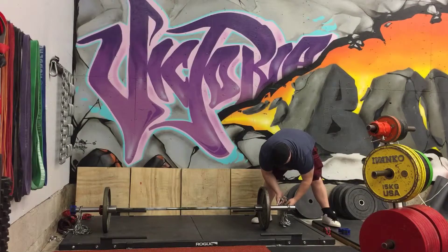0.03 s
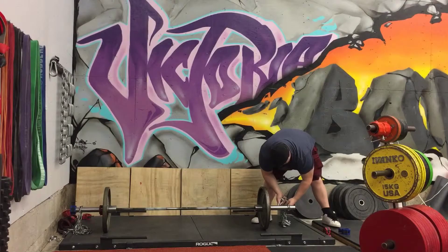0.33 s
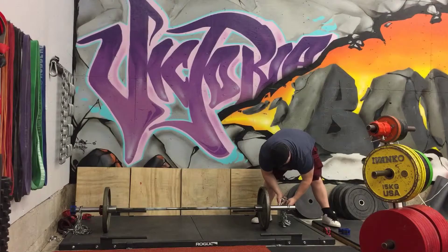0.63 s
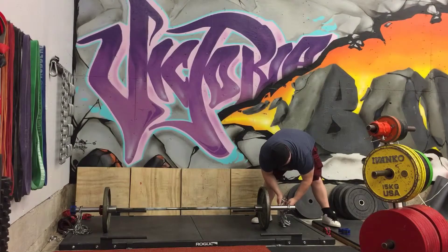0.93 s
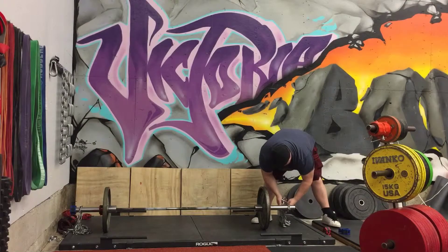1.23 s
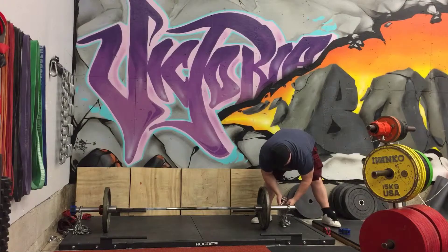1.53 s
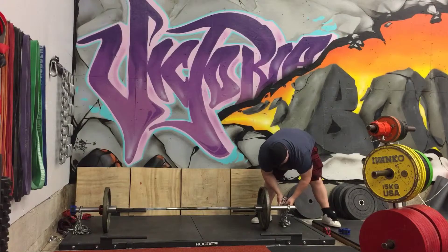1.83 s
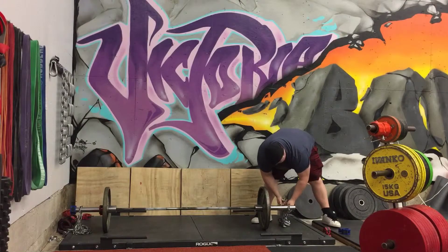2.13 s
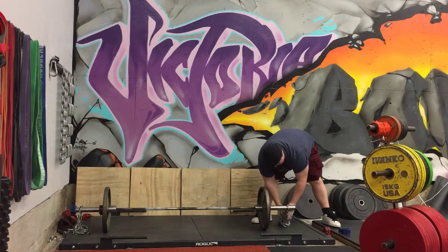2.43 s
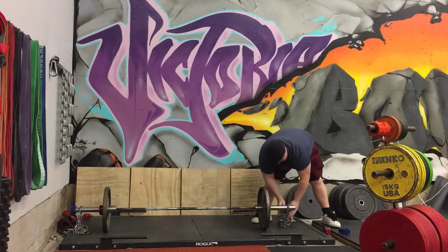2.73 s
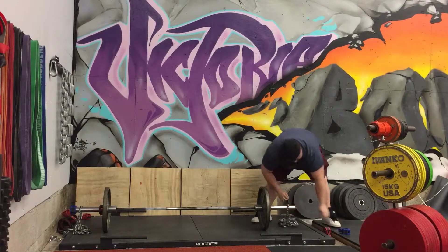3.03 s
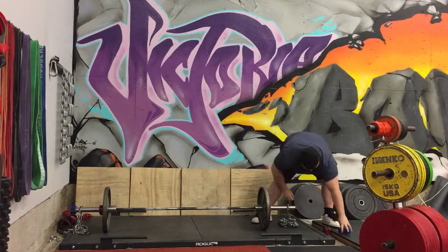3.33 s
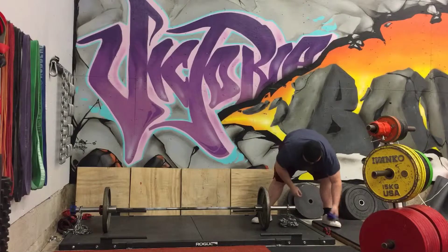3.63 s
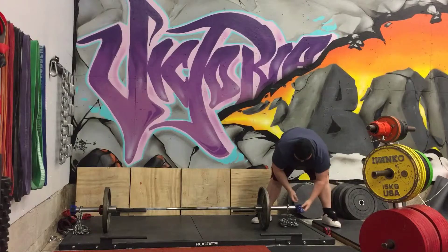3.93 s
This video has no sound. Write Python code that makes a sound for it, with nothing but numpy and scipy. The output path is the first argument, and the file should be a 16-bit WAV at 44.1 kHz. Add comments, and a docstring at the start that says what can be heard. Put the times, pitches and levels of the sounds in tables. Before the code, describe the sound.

Bright, scattered clinks of a metal chain turn into knocks on a barbell that rattle its plates. The chain spills onto rubber flooring twice, and a light iron knock follows. Ventilation hums quietly in the reverberant gym.

```python
"""Ventilation hums in a hard, reverberant gym. For two seconds a steel chain is handled at the end of
a loaded barbell: each contact is a short clack plus the very high ring of the links, in two pitch groups.
From 1.2 s it knocks and slides on the bar, which rings faintly; the knocks rattle the loose plates.
It is let down in two pours, near 2.3 s and 3.0 s, and the heap thuds on the rubber floor.
A light knock of iron ends it at 3.4 s."""
import sys
import numpy as np
from scipy import signal
from scipy.fft import rfft, irfft
from scipy.io import wavfile

SR = 44100
rng = np.random.default_rng(int(sys.argv[2]) if len(sys.argv) > 2 else 0)


def log_audio(samples):
    """Write samples as a 16-bit WAV file to the path given in sys.argv[1]."""
    # one column per channel
    frames = np.atleast_2d(samples).T
    # limit to full scale, then quantise
    limited = np.clip(frames, -1, 1)
    pcm = np.round(limited * 32767).astype(np.int16)
    wavfile.write(sys.argv[1], SR, pcm)


N = 176400

RING_RISE_S, CLACK_RISE_S = 0.0025, 0.00065
# Chain knocks on the bar. Each row: time in seconds, relative level in dB.
BAR_HITS = [(1.203, -60), (1.216, -58), (1.283, -69), (1.536, -64), (2.4524, -48), (2.572, -54.5),
            (3.072, -66)]


def from_db(db):
    """Decibels to gain."""
    return 10 ** (np.asarray(db) / 20)


def at_hz(points, hz, column=1):
    """Table column interpolated over log frequency."""
    points = np.array(points)
    return np.interp(np.log(np.maximum(hz, 1)), np.log(points[:, 0]), points[:, column])


def noise(spectrum):
    """Coloured noise, rms 1."""
    gains = from_db(at_hz(spectrum, np.fft.rfftfreq(N, 1 / SR)))
    x = irfft(rfft(rng.standard_normal(N)) * gains, N)
    return x / x.std()


def bell(hz, octaves):
    """Spectrum of a broad resonance, 3 dB down at `octaves` from its centre."""
    return [(hz * 2 ** (k * octaves), -10 * np.log10(2) * k * k) for k in range(-6, 7)]


def decay(t60_s, rise_s=1e-6):
    """Quick rise, exponential fall to -60 dB."""
    t = np.arange(int(t60_s * SR)) / SR
    return np.exp(-np.log(1000) * t / t60_s) * (1 - np.exp(-t / rise_s))


def add(out, start_s, sound):
    """Mix a sound in at start_s."""
    i = int(np.clip(start_s * SR, 0, N - 1))
    out[i:i + len(sound)] += sound[:N - i]


def sines(hz, phase_cycles, length):
    """One unit sine per row."""
    t = np.arange(length) / SR
    return np.sin(2 * np.pi * (np.outer(hz, t) + phase_cycles[:, None]))


def bursts(times_s, levels_db, spectrum, t60_s, rise_s=CLACK_RISE_S):
    """Damped impacts: fast-decaying coloured noise."""
    envelope = np.zeros(N)
    for start_s, db in zip(times_s, levels_db):
        add(envelope, start_s, from_db(db) * decay(t60_s, rise_s))
    return envelope * noise(spectrum)


def ventilation(air_db=-69, waver_depth=0.17):
    """Soft rumble and hiss with a slightly wavering hum."""
    # Air noise. Each row: frequency in Hz, relative density in dB.
    air = [(25, -28.5), (40, -2.5), (58, 5.5), (85, -1.5), (115, -5.5), (160, -12), (240, -10.5),
           (430, -24), (900, -27), (3500, -33), (5200, -39.5), (9500, -41), (15000, -50.5)]
    # Hum tones. Each row: frequency in Hz, rms level in dB.
    hum = [(120, -67.5), (240, -78), (360, -88.5), (565, -91)]
    out, t = from_db(air_db) * noise(air), np.arange(N) / SR
    for hz, db in hum:
        waver = np.interp(t, np.linspace(0, t[-1], 32), rng.standard_normal(32))
        tone = np.sin(2 * np.pi * (hz * t + rng.random()))
        out += np.sqrt(2) * from_db(db) * (1 + waver_depth * waver) * tone
    return out


def gym_reverb(direct, delay_s=0.0054):
    """Diffuse tail that dies band by band, treble first."""
    # Reverberation. Each row: frequency in Hz, level in dB re direct sound, T60 in seconds.
    room = [(100, 7, 1.6), (280, 5.5, 1.5), (520, -0.5, 1.26), (1550, -0.5, 1.46), (3390, -2.5, 1.25),
            (6560, -5, 0.83), (10930, -4.5, 0.44), (12100, -5.5, 0.31), (15500, -19, 0.17)]
    edges_hz = np.r_[np.geomspace(60, 6000, 13), np.linspace(7500, 16500, 7)]
    tail, white = np.zeros(N), rng.standard_normal((2, N))
    for k, (low_hz, high_hz) in enumerate(zip(edges_hz, edges_hz[1:])):
        hz = np.sqrt(low_hz * high_hz)
        fade = decay(at_hz(room, hz, column=2))
        bandpass = signal.butter(2, [low_hz, high_hz], "band", fs=SR, output="sos")
        band = signal.sosfilt(bandpass, white[k % 2, :len(fade)])
        add(tail, delay_s, from_db(at_hz(room, hz)) * band * fade / np.linalg.norm(fade))
    return signal.fftconvolve(direct, tail)[:N]


def struck_iron(hits, modes, spread=0.039, count=8):
    """Loose plates spread each mode into a cluster of close partials, new at each blow."""
    out = np.zeros(N)
    for hz, mode_db, t60_s in modes:
        fade = decay(t60_s, CLACK_RISE_S)
        for (start_s, db), (detune, phase) in zip(hits, rng.random((24, 2, count))):
            cluster = sines(hz * (1 + spread * (2 * detune - 1)), phase, len(fade)).sum(axis=0)
            add(out, start_s, from_db(db + mode_db) * fade * cluster / np.sqrt(count))
    return out


def bar_ring(gain_db=-7, slip_count=7):
    """The bar rings as the chain knocks on it and slides along it in uneven slips."""
    # Bar modes. Each row: frequency in Hz, relative level in dB, T60 in seconds.
    modes = [(536, -18, .4), (1734, -22, .47), (2560, -7.5, .45), (2750, -11.5, 0.32), (4400, -7.5, .36)]
    # The slide: start in seconds, end in seconds, relative level in dB.
    slide = (1.2, 1.9, -65.5)
    start_s, end_s, db = slide
    step_s = (end_s - start_s) / slip_count
    slips = [(start_s + (k + late) * step_s, db) for k, late in enumerate(rng.random(slip_count))]
    return from_db(gain_db) * struck_iron(BAR_HITS + slips, modes)


def last_knock(time_s=3.399):
    """One light, quickly damped blow on iron."""
    # Iron modes. Each row: frequency in Hz, level in dB, T60 in seconds.
    modes = [(936, -68, 0.051), (1555, -55.5, 0.037), (2120, -62.5, 0.028), (4500, -65, 0.091)]
    return struck_iron([(time_s, 0)], modes)


def plate_clatter(gain_db=2.5):
    """Loose plates rattle on the bar after each knock of the chain."""
    # Clatter spectrum. Each row: frequency in Hz, relative density in dB.
    spectrum = [(400, -26.5), (1700, -17), (2050, 0), (2650, 2), (3500, -16.5), (4350, 8), (5000, -8),
                (6000, 5), (7800, -10), (9200, 12), (9800, -16.5), (15000, -18)]
    times_s, levels_db = np.transpose(BAR_HITS)
    return bursts(times_s, levels_db + gain_db, spectrum, t60_s=0.15)


def rubber_floor(rise_s=0.005):
    """Each landing is a short slap over a deeper, longer thud, so its pitch sinks."""
    # Chain landings. Each row: time in seconds, thud level in dB, slap level in dB.
    landings = [(1.211, -71.5, -84), (1.29, -76.5, -75), (2.344, -63.5, -58.5), (2.454, -56, -58),
                (2.522, -61.5, -59), (2.576, -63, -64.5), (3.014, -60, -67.5), (3.07, -64, -57.5),
                (3.122, -63.5, -74), (3.299, -67.5, -88)]
    # Thud spectrum. Each row: frequency in Hz, relative density in dB.
    thud = [(60, 7.5), (160, 8.5), (290, 19), (410, 9), (800, -47.5)]
    times_s, thud_db, slap_db = np.transpose(landings)
    slaps = bursts(times_s, slap_db, bell(hz=544, octaves=0.2), t60_s=0.13, rise_s=rise_s)
    return slaps + bursts(times_s, thud_db, thud, t60_s=0.26, rise_s=rise_s)


def contacts(tumbles_per_s=160, scatter_db=10):
    """Distinct clinks, plus small random ones as links tumble over each other."""
    # Each row: time in seconds, then relative levels in dB of clack, high ring, low ring.
    clinks = [(0.002, -72, -51, -75), (0.02, -64.5, -65, -69), (0.202, -64.5, -67.5, -69),
              (0.272, -72, -62, -77), (0.456, -68.5, -62, -83), (0.478, -60, -80, -81),
              (0.52, -70, -46.5, -62), (0.536, -63, -45.5, -64), (0.727, -64.5, -48.5, -74),
              (0.767, -69.5, -58, -82), (0.787, -87, -47.5, -79), (0.822, -83, -48.5, -60),
              (0.861, -63, -43, -52), (0.992, -75, -56.5, -75), (1.197, -62, -55, -85),
              (1.216, -48, -46, -63), (1.236, -63, -50, -60), (1.284, -56, -52, -75), (1.32, -75, -53, -78),
              (1.445, -62, -53, -87), (1.464, -62, -54, -86), (1.536, -50.5, -53.5, -63.5),
              (1.61, -72.5, -53.5, -79), (1.752, -71, -50.5, -67), (1.801, -76.5, -58, -74.5),
              (1.918, -59, -70, -54.5), (1.94, -59, -48.5, -67), (1.966, -62, -42, -61),
              (1.989, -55, -52.5, -66), (2.012, -67, -40, -72), (2.036, -72, -44.5, -72.5),
              (2.133, -57.5, -44.5, -60), (2.186, -60, -38, -62.5), (2.249, -52.5, -65, -69),
              (2.275, -53, -61.5, -38.5), (2.313, -53, -37.5, -47), (2.334, -43, -39, -37),
              (2.349, -49.5, -55.5, -31.5), (2.359, -48.5, -48, -26.5), (2.377, -51, -54.5, -34),
              (2.394, -59, -54, -30), (2.416, -51, -55, -41.5), (2.4526, -35, -42, -36),
              (2.469, -38, -43, -25.5), (2.517, -52, -51, -28), (2.526, -43.5, -37, -42.5),
              (2.5711, -34, -48.5, -30.5), (2.62, -41.5, -63.5, -57), (2.968, -51, -84, -56.5),
              (3.007, -55.5, -80, -59), (3.037, -43, -60, -41.5), (3.068, -46, -66, -30),
              (3.073, -38.5, -63, -23.5), (3.087, -56.5, -64, -31.5), (3.103, -51, -69, -44),
              (3.121, -58, -73, -36.5), (3.138, -57, -76, -44), (3.399, -62, -86.5, -74)]
    # Each row: start and end in seconds, then the same three levels.
    tumbles = [(0.736, .9, -79, -71, -79), (1.21, 1.35, -74, -70, -81), (1.957, 2.05, -63.5, -48, -68),
               (2.277, 2.332, -65, -59, -54.5), (2.335, 2.411, -52.5, -61, -39.5),
               (2.453, 2.61, -51.5, -60.5, -43), (3.041, 3.138, -58, -85, -48)]
    rows = list(clinks)
    for start_s, end_s, *levels_db in tumbles:
        for k, (late, *scatter) in enumerate(rng.random((56, 4))):
            time_s = start_s + (k + late) / tumbles_per_s
            if time_s < end_s:
                rows.append((time_s, *(np.array(levels_db) + scatter_db * (np.array(scatter) - 0.5))))
    return np.array(rows)


def tinks(times_s, levels_db, low_hz=2504, high_hz=9320, count=12):
    """Brief partials of a clack; their pitches depend on where the links meet, here at random."""
    out, fade = np.zeros(N), decay(t60_s=0.012, rise_s=CLACK_RISE_S)
    for start_s, db, (place, phase) in zip(times_s, levels_db, rng.random((400, 2, count))):
        hz = low_hz * (high_hz / low_hz) ** ((np.arange(count) + place) / count)
        partials = sines(hz, phase, len(fade)).sum(axis=0) / np.sqrt(count)
        add(out, start_s, from_db(db) * fade * partials)
    return out


def link_rings(times_s, levels_db, modes, t60_s, spread_hz, scatter_db=5.5):
    """Two touching links ring slightly out of tune, soon damped by their neighbours."""
    out, fade = np.zeros(N), decay(t60_s, RING_RISE_S)
    hz, mode_db = np.transpose(modes + modes)  # one set per link
    draws = rng.standard_normal((400, 3, len(hz)))
    for start_s, db, (detune, scatter, phase) in zip(times_s, levels_db, draws):
        gains = from_db(mode_db + scatter_db * scatter)
        ring = fade * (gains @ sines(hz + spread_hz * detune, phase / 2, len(fade)))
        add(out, start_s, from_db(db) * ring * np.linalg.norm(fade) / np.linalg.norm(ring))
    return out


def chain(rebound_s=0.0035, rebound_db=-3.5):
    """Each contact clacks, rebounds once, rings its links and jingles their neighbours; some snap."""
    # Clack spectrum. Each row: frequency in Hz, relative density in dB.
    clack = [(400, -8.5), (1200, -4.5), (2000, -9), (3500, 7), (4500, 8.5), (6000, 6.5), (9000, 5.5),
             (11500, -0.5), (15500, -27.5)]
    # Link modes, two pitch groups. Each row: frequency in Hz, relative level in dB.
    high_modes = [(12000, -2.5), (12190, 0.5), (12400, -6.5), (12570, -9.5), (13150, -13.5)]
    low_modes = [(10160, 0.5), (10560, -6.5), (10965, 2.5), (11310, -2)]
    # Hard edge-on contacts. Each row: time in seconds, level in dB.
    edge_hits = [(.7865, -57), (1.217, -42), (1.535, -50.5), (1.965, -53), (1.99, -55), (2.0365, -44),
                 (2.186, -56), (2.333, -44.5), (2.4525, -46.5), (2.527, -50.5)]
    times_s, clack_db, high_db, low_db = contacts().T
    impacts_s = np.r_[times_s, times_s + rebound_s]
    impacts_db = np.r_[clack_db, clack_db + rebound_db]
    clacks = bursts(impacts_s, impacts_db + 5, clack, t60_s=0.012)
    high = link_rings(times_s, high_db - 2, high_modes, t60_s=0.13, spread_hz=63)
    low = link_rings(times_s, low_db - 4.5, low_modes, t60_s=0.079, spread_hz=44)
    jingle = bursts(times_s, clack_db - 9.5, bell(hz=3130, octaves=0.69), t60_s=0.068, rise_s=RING_RISE_S)
    snaps = bursts(*np.transpose(edge_hits), bell(hz=13620, octaves=0.14), t60_s=0.028)
    return clacks + high + low + jingle + snaps + tinks(times_s, clack_db + 0.5)


def scene():
    """Barbell, chain and floor in the room, over the ventilation; mono."""
    direct = bar_ring() + last_knock() + plate_clatter() + chain() + rubber_floor()
    return (direct + gym_reverb(direct) + ventilation())[None]


def record(dry):
    """Steep low-pass."""
    cutoff_hz = 15700
    return signal.sosfilt(signal.ellip(12, 0.1, 80, cutoff_hz, fs=SR, output="sos"), dry)


dry = scene()
out = record(dry)
log_audio(out)
```